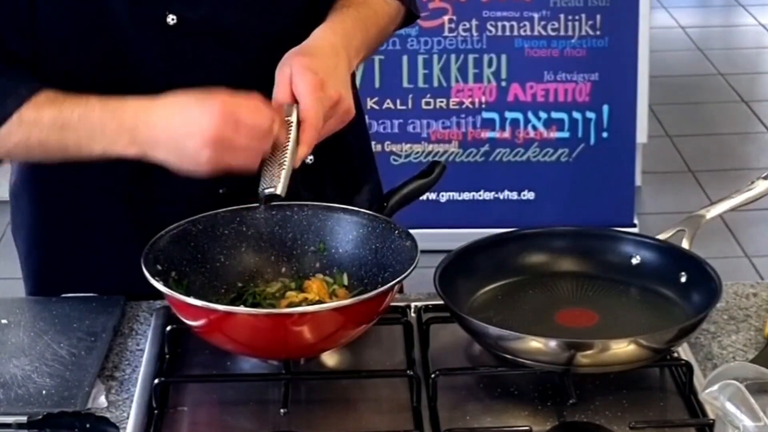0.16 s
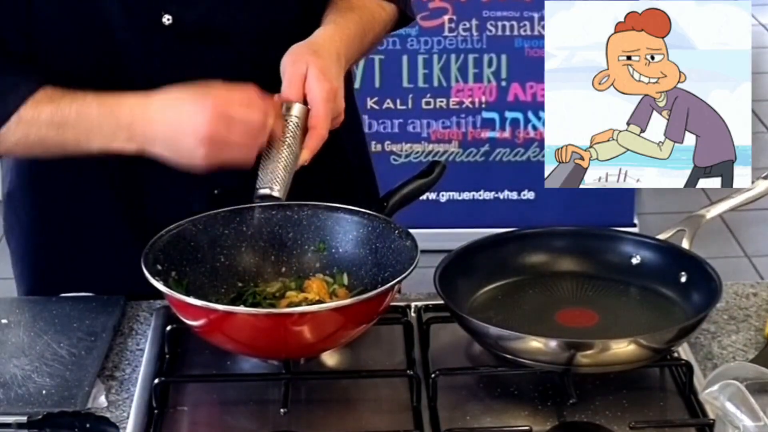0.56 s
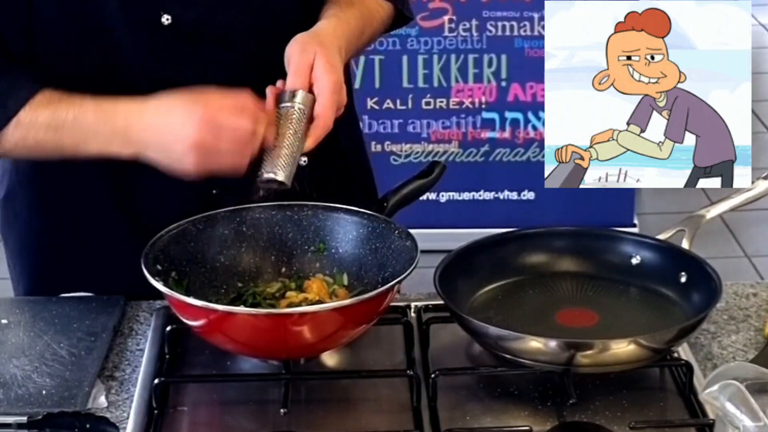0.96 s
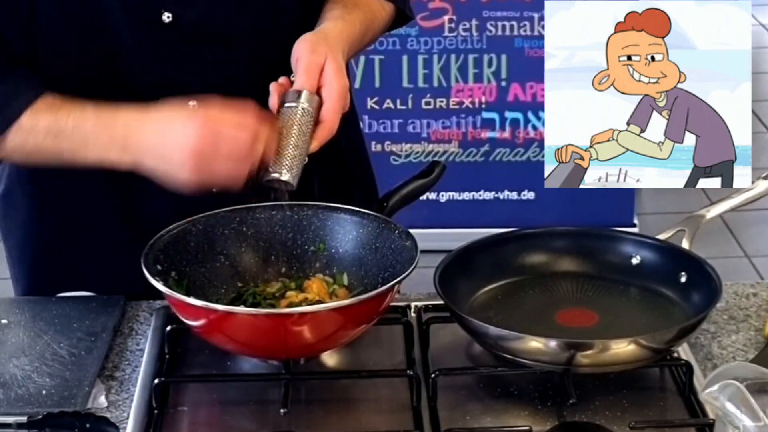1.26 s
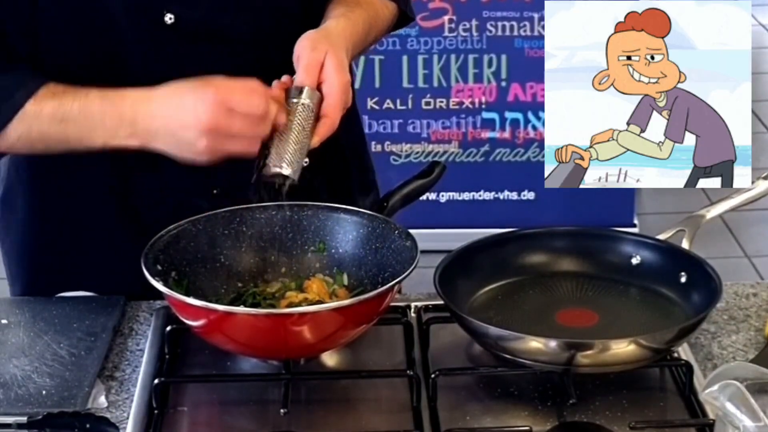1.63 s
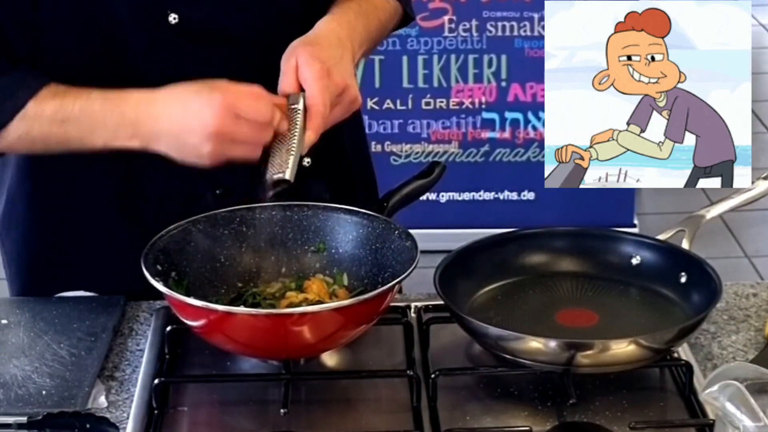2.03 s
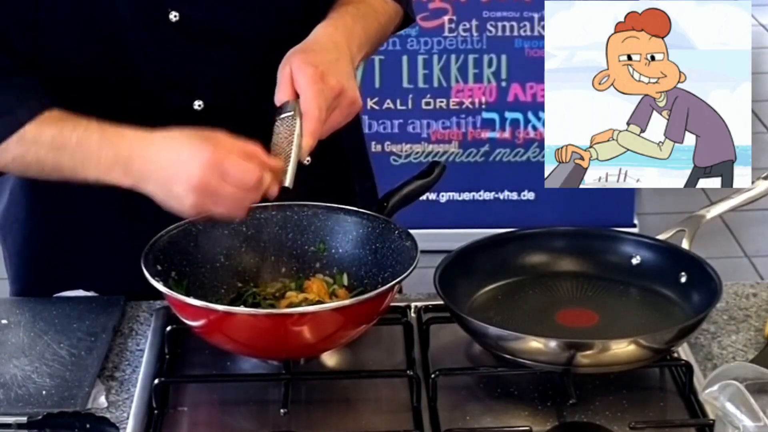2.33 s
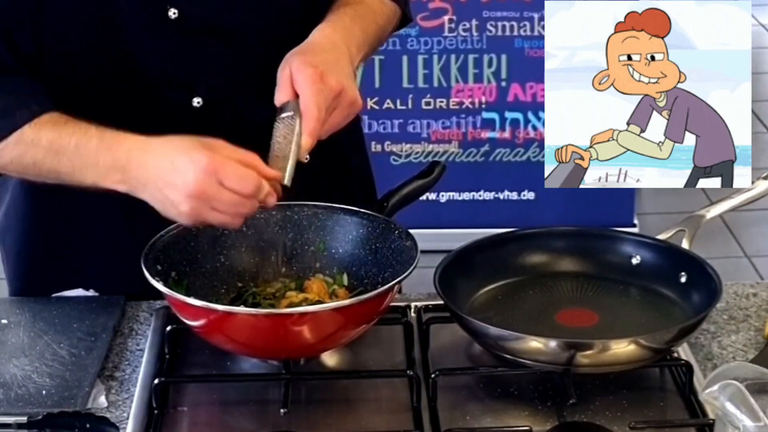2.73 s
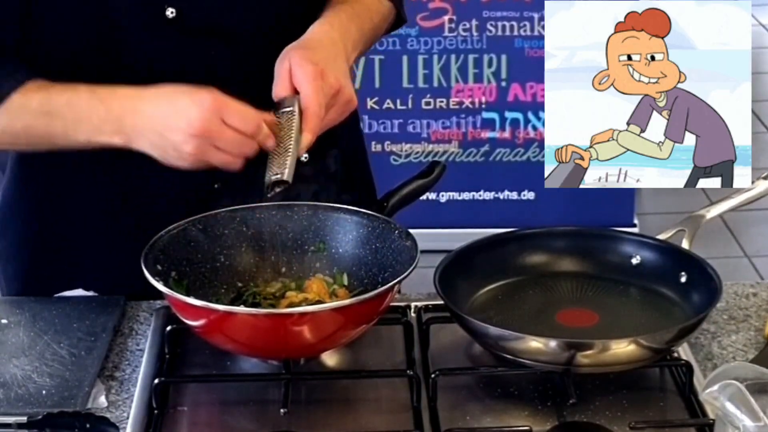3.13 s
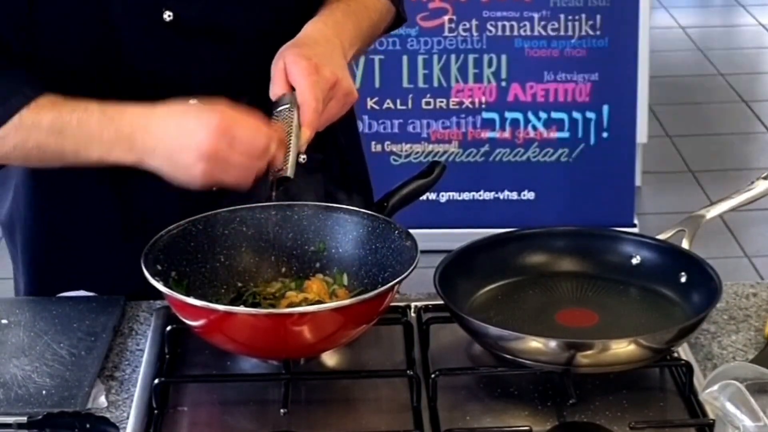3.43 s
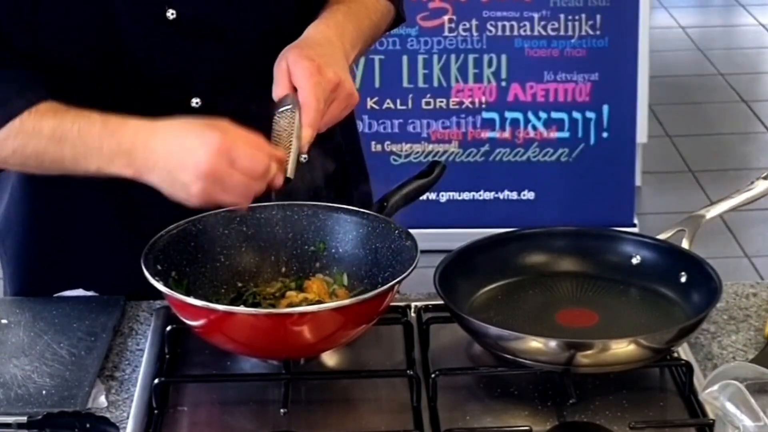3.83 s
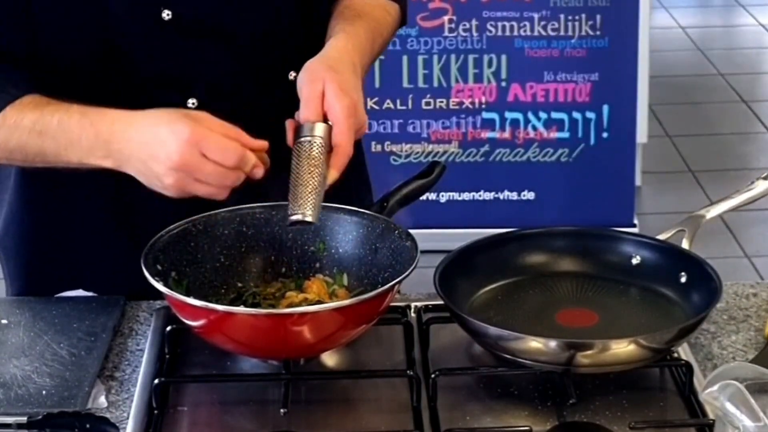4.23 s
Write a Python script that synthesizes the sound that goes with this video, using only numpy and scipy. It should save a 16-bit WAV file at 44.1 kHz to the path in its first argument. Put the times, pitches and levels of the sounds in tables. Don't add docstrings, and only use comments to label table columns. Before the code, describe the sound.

From 0 s a hard dry nutmeg is already being rubbed on a small curved steel grater, close to a small stereo camera. Short alternating strokes, roughly ten a second, each last about 0.06 s: dense crackling snaps blurred into a rasp, with fine bright grit, a thin metallic zing around 2 to 3 kHz and a hollow shell hum near 900 Hz. Pressure varies; sharper catches stand out, with a stronger boom at about 0.77 s. The bout ends near 2.75 s. Tiny slips and a set-down touch sound around 2.9 and 3.2 s, then a softer bout starts faintly at 3.27 s, firms up, with a harder catch and boom near 3.8 s, and stops about 4.05 s. Faint ticks follow, the clearest at 4.38 s. The tiled room adds a short tail of under half a second. Outside, low engine hums glide upward over muffled traffic rumble, strongest early, with faint air hiss.

```python
import sys
import numpy as np
from scipy import signal
from scipy.fft import rfft, irfft, next_fast_len
from scipy.io import wavfile
from scipy.ndimage import uniform_filter1d

SR = 44100
rng = np.random.default_rng(int(sys.argv[2]) if len(sys.argv) > 2 else 0)


def invert_db(x):
    u = np.asarray(x, float) / 20
    return 10 ** u


def put_to_file(sound):
    columns = np.atleast_2d(sound).T
    safe = np.clip(columns, -1, 1)
    whole_steps = np.round(safe * 32767)
    wavfile.write(sys.argv[1], SR, whole_steps.astype(np.int16))


N = 193554
T = np.arange(N) / SR

# pitch_hz, width_hz, level_db, left_lead_rad, left_minus_right_db
SHELL_MODES = [(519, 14, -6, 1.1, -11), (850, 27, -6, 0.86, 21), (934.5, 30, 18, 1.24, -1),
               (976, 20, -5, -0.79, 7), (1087, 190, -5.5, 0.093, -5), (1392, 35, -4.5, -1.1, 13),
               (1487, 36, -4, -2.3, -16)]
RIM_MODES = [(800, 43, -10, 0, 0), (990, 36, -5, .5, 0), (1050, 38, 3, 0, 0), (1277, 31, 12, -0.46, 0)]
FACE_MODES = [(2120, 41, 6.5, -3.5, 0.4), (2024, 29, -2, -12, 1), (2150, 62, -9, -1.5, 0.81),
              (2274, 140, 3.5, 2, 1.5), (2267, 88, 4, -0.54, 0.99), (2320, 46, 6.5, -0.46, 1.9),
              (2435, 71, -6, 4, 0.76), (2494, 67, 2, -4, 7), (2544, 88, 5, -6, 1.3),
              (2737, 60, -3, 0.7, 1.5), (2930, 150, -3, -6.5, 1.5)]
TEETH_MODES = [(2996, 96, -9, 1, 1.4), (3133, 48, -1, -1.5, 2.4), (3300, 66, -3, -1.8, 1.2),
               (3638, 114, -1.5, 1.05, 0.68), (3860, 160, -6.5, -2.54, 0.59), (4490, 140, -7.5, 1, 1),
               (4644, 86, -4, -3, 0.61), (4856, 112, -6, 1.87, 0.31), (5190, 240, -6, 1, 0.92),
               (5566, 250, -7.5, 1, 0.51), (6330, 130, -11.5, -1.5, 1), (6900, 196, -8, -1, 0.96),
               (7400, 330, -6.5, -2.5, 1.8)]
BURR_MODES = [(9280, 520, -1.5, -2, 0), (10670, 380, -2, 2, -1), (11580, 360, 0, -2, -1),
              (11940, 510, -4, 1.5, 0), (13000, 590, 4.5, -1.6, 0), (14140, 200, 0.5, 1, 0),
              (14600, 550, -5, -1, 0), (15300, 450, -3, -2, 0)]
# pitch_hz, level_db
RASP_COLOUR = [(400, -26), (700, -54), (1350, 0.5), (1780, -44), (2300, -2.5), (4100, -8.5), (5950, -6.5),
               (7600, -13.5), (8500, -18.5), (10000, -40)]
# pitch_hz, level_db
GRIT_COLOUR = [(7600, -10), (8600, 4.5), (9400, -1.5), (10800, -1), (11700, -1), (13200, -1.5), (14500, -1),
               (15800, -13)]
# start_s, length_s, level_db
KNOCKS = [
    (4.017, 0.026, -38.5),
]


def grater():
    face, shell, grit, place = contact()
    bite = snaps(rate_hz=2800., spread_db=3.0, row_db=2.0)
    bite[[int(row[0] * SR) + 9 for row in TOUCHES + LIGHT_TOUCHES]] = 7
    drag = snaps(rate_hz=12000., spread_db=2.5, row_db=1.0)
    burrs = np.array([snaps(rate_hz=9700.0, spread_db=2.0, row_db=2.0) for _ in range(2)])
    edge = face ** .25 * grit ** .75
    knock = sum(invert_db(db) * (T > s) * np.exp(-((T - s) / length) ** 2) for s, length, db in KNOCKS)

    trembling = drag * uniform_filter1d(shell, int(0.028 * SR))
    shell_hum = sheet(trembling + 0.55 * bite * shell, SHELL_MODES, patchy_db=3.5)
    rim_hum = sheet(drag * knock, RIM_MODES, patchy_db=11.0)
    hum = rms(shell) * level(shell_hum, -7.5) + rms(knock) * level(rim_hum, 0)
    hum = colour(hum, [(350, -68), (480, 2.5), (800, -12.5), (900, -2.5), (1500, -0.5), (1800, -11), (4000, -30)])

    face_zing = sheet(bite * face, FACE_MODES, patchy_db=4.0, lean_db=3.7 * place)
    teeth_zing = sheet(bite * edge, TEETH_MODES, patchy_db=6.5, patch_hz=45.05)
    zing = rms(face) * level(face_zing, -7.5) + rms(edge) * level(teeth_zing, 0.46)
    zing = colour(zing, [(600, -10), (1750, -7), (2000, -2.0), (7800, 0), (8500, 6.5), (12000, -21)])

    rasp = rms(edge) * level(colour((bite + 1.4 * burrs) * edge, RASP_COLOUR), -3.0)
    fine_grit = rms(grit) * level(colour((0.43 * bite + burrs) * grit, GRIT_COLOUR), -7.5)
    burr_ring = sheet(bite * grit, BURR_MODES, patchy_db=1.5, patch_hz=60.2)
    burr_ring = colour(burr_ring, [(7000, -37), (8800, -1), (9300, 1), (16500, -0.5)])
    return hum + zing + rasp + fine_grit + rms(grit) * level(burr_ring, -4.0)


# start_s, length_s, pressure_db
FIRST_BOUT = [(0.0, 0.027, -33.5), (0.066, 0.046, -35.5), (0.155, 0.064, -36), (0.258, 0.061, -37.5),
              (0.361, 0.056, -36), (0.464, 0.049, -32.5), (0.555, 0.07, -37), (0.673, 0.045, -37),
              (0.762, 0.056, -33.5), (0.862, 0.062, -33), (0.956, 0.072, -35.5), (1.066, 0.052, -38.5),
              (1.186, 0.049, -35), (1.274, 0.065, -37), (1.381, 0.069, -35), (1.48, 0.053, -36.5),
              (1.583, 0.063, -40.5), (1.688, 0.05, -37), (1.768, 0.061, -37.5), (1.879, 0.061, -39.5),
              (1.987, 0.059, -38.5), (2.092, 0.046, -35.5), (2.176, 0.069, -39.5), (2.284, 0.061, -37),
              (2.388, 0.073, -37), (2.49, 0.055, -32.5), (2.596, 0.069, -36), (2.692, 0.058, -37)]
SECOND_BOUT = [
    (3.268, 0.055, -47),
    (3.372, 0.052, -42),
    (3.466, 0.074, -41),
    (3.571, 0.064, -36.5),
    (3.674, 0.082, -40),
    (3.779, 0.048, -35),
    (3.888, 0.064, -39.5),
    (3.986, 0.063, -41),
    (4.383, 0.0058, -85),
]
# start_s, shell_db, grit_db
HOLD = [(0, -50, -54.5), (.3, -39.5, -51), (.48, -36, -51.5), (.6, -39.5, -50), (0.851, -38, -51),
        (1.3, -35, -46), (1.55, -42, -49), (1.9, -36.5, -49), (2.3, -42.5, -50), (2.7, -43, -49),
        (3.28, -47, -53.5), (3.45, -47, -51), (3.7, -47, -52.5), (4.0, -40, -50.5)]
# start_s, peak_db, grit_db
CATCHES = [(0.073, -35, -36), (0.0822, -30, -51), (0.67, -20, -21), (0.8614, -25, -12), (1.1895, -22, -12),
           (1.2305, -24, -12), (1.286, -21, -44), (1.3897, -26, -2.5), (1.6827, -26, -14),
           (1.7897, -30, -19), (2.107, -30, -14), (1.876, -30, -26), (1.889, -19, -33),
           (1.9841, -21.5, -10), (2.2916, -18.5, -33), (2.412, -23, -23), (2.7162, -17, -33),
           (3.394, -31, -17), (3.583, -31, -20), (3.7853, -22, -28)]
RIM_CATCHES = [
    (0.464, -32, -18),
    (0.7672, -17.5, -28),
    (3.8187, -21.5, -28),
]
# start_s, peak_db, shell_db, grit_db
LIGHT_TOUCHES = [
    (2.8875, -46, -8, -3),
    (3.1885, -33, -14, -22),
    (3.198, -46, 23, -14),
    (3.212, -42, -8, -16),
    (3.228, -43, -8, -14),
    (4.218, -48, 0, -18),
    (4.345, -46, -8, -16),
    (4.384, -30, -4, -18),
]
CATCH_SHELL_DB, RIM_SHELL_DB = -11, 5
TOUCHES = [(s, db, CATCH_SHELL_DB, grit_db) for s, db, grit_db in CATCHES]
TOUCHES += [(s, db, RIM_SHELL_DB, grit_db) for s, db, grit_db in RIM_CATCHES]


def contact(fall_s=0.013, touch_s=0.0067, touch_db=-8.0):
    usual_push_db = -37
    shell_follows, grit_follows = 0.53, 0.5
    down_shell_db, down_grit_db = 3.0, 0.1
    arch_db = 2.5
    pressure, place = np.zeros((3, N)), np.zeros(N)
    s, shell_db, grit_db = np.transpose(HOLD)
    for k, (start, length, db) in enumerate(FIRST_BOUT + SECOND_BOUT):
        near = slice(max(int((start - .1) * SR), 0), int((start + .3) * SR))
        t, down, extra_db = T[near] - start, k % 2, db - usual_push_db
        along = np.clip(t / length, 0, 1) - .5
        rise_s = 0.0084 if down else 0.0066
        swell_db = 0.2 if down else -0.27
        grip = np.exp(np.minimum(np.minimum(t / rise_s, (length - t) / fall_s), .7))
        shell_felt = np.interp(start, s, shell_db) + shell_follows * extra_db + down_shell_db * (down - .5)
        grit_felt = np.interp(start, s, grit_db) + grit_follows * extra_db + down_grit_db * (down - .5)
        travel = invert_db(2 * swell_db * along + arch_db * (.5 - (2 * along) ** 2))
        pressure[:, near] += grip * travel * invert_db([[db], [shell_felt], [grit_felt]])
        place[near] = np.where(t > -.015, along, place[near])
    for start, db, touch_shell_db, touch_grit_db in TOUCHES + LIGHT_TOUCHES:
        near = slice(int(start * SR), int((start + .1) * SR))
        felt_db = db + touch_db + np.array([[0], [touch_shell_db], [touch_grit_db]])
        pressure[:, near] += np.exp((start - T[near]) / touch_s) * invert_db(felt_db)
    return *pressure, place


def snaps(rate_hz, spread_db, row_db, top_db=12.0):
    moment, strength, direction = rng.random((3, N))
    size = invert_db(np.minimum(-spread_db * np.log(strength), top_db)) * np.sign(direction - .5)
    return level((moment < rate_hz / SR) * size * invert_db(row_db * walk(190.)), 0)


def sheet(force, modes, patchy_db, patch_hz=25.04, lean_db=0):
    out, middle_hz = np.zeros((2, N)), np.mean(modes, axis=0)[0]
    for hz, width_hz, db, lead, pan_db in modes:
        drive_db = db + patchy_db * np.tanh(walk(patch_hz)) + lean_db * np.log2(hz / middle_hz)
        z = ring(force * invert_db(drive_db), hz, width_hz)
        left = z * invert_db(pan_db / 2) * np.exp(.5j * lead)
        right = z * invert_db(-pan_db / 2) * np.exp(-.5j * lead)
        out += np.imag([left, right])
    return out


def kitchen(x, t60_s=0.44, mid_t60_s=0.42, high_t60_s=0.37, wet_db=-5.0, gap_s=0.00311, alike=0.36):
    t = T[:SR]
    noise = rng.standard_normal((2, SR)) + alike * rng.standard_normal(SR)
    low, mid = (signal.sosfilt(signal.butter(2, hz, fs=SR, output="sos"), noise) for hz in (3500, 8000))
    tail = low * invert_db(-60 * t / t60_s)
    tail += (mid - low) * invert_db(-60 * t / mid_t60_s)
    tail += (noise - mid) * invert_db(-60 * t / high_t60_s)
    tail *= (t > gap_s) * invert_db(wet_db) / np.sqrt(np.sum(tail ** 2) / 2)
    return x + signal.fftconvolve(x, tail, axes=1)[:, :N]


# start_s, end_s, halfway_hz, level_db
LORRY = [(-.2, .3, 60.2, -38), (-.1, 1.179, 73.8, -36.5), (-.1, 1.295, 83.8, -52),
         (-.1, 0.59, 130.5, -44.5), (-.1, 0.596, 143.7, -43.5), (-.1, 0.67, 175.9, -41.5),
         (0.392, 1.353, 172.2, -45), (0.798, 1.3, 210.5, -47.5), (0.957, 1.7, 140.2, -47.5),
         (1.107, 2.29, 74.6, -53), (1.248, 1.941, 202.4, -44.5), (1.319, 2.358, 169.8, -43),
         (1.725, 3.104, 60.5, -35.5)]
VAN = [
    (2.801, 4.629, 73.47, -41.5),
    (3.31, 4.7, 59.9, -41.5),
]
BUS = [
    (2.194, 3.404, 100.4, -49.5),
    (3.002, 3.88, 203.6, -50),
    (3.402, 4.514, 134.4, -47.5),
    (3.594, 4.6, 166.1, -47.5),
]


def engine(wobble_db=4.0, unsteady=0.0031):
    out, speed = np.zeros((2, N)), 1 + unsteady * walk(5.925)
    for orders, gain_per_s in [(LORRY, 0.096), (VAN, 0.1573), (BUS, 0.0531)]:
        for start, end, middle_hz, db in orders:
            near = slice(max(int(start * SR), 0), int(end * SR))
            along = np.clip((T[near] - start) / (end - start), 0, 1)
            hz = middle_hz * (1 + gain_per_s * (along - .5) * (end - start)) * speed[near]
            phase = 2 * np.pi * (np.cumsum(hz) / SR + rng.random((2, 1)))
            swell = np.sqrt(np.sin(np.pi * along) + 1e-9)
            out[:, near] += swell * invert_db(db + 1.5 + wobble_db * np.tanh(walk(9.)[near])) * np.sin(phase)
    return out


# start_s, level_db
TRAFFIC = [(0, -53.5), (.9, -51), (1.798, -54), (2.6, -61.5), (3.298, -58), (4.39, -57.5)]
# pitch_hz, level_db
TRAFFIC_COLOUR = [(15, -20), (30, -11), (45, -38), (60, 5), (220, -9.5), (300, -8.5), (420, -17.5),
                  (800, -20), (1500, -27)]
# pitch_hz, width_hz, level_db
ROOM_MODES = [(66, 5.3, -56), (78, 7, -46.5), (86.5, 14, -55), (138.2, 5.6, -51), (163.3, 17, -50.5),
              (207.1, 2.5, -53)]
# pitch_hz, level_db
AIR_COLOUR = [(400, 2), (700, -1.5), (1700, -7), (2500, -7), (4000, -13), (7500, -18), (8500, -25),
              (16000, -26)]
# start_s, level_db
RUSTLE = [(0, 3), (3.1, -0.5), (3.2, 1.5), (4.1, -0.5), (4.39, 2)]


def background():
    swell = invert_db(np.interp(T, *np.transpose(TRAFFIC)))
    rumble = level(colour(rng.standard_normal((2, N)), TRAFFIC_COLOUR), 9.67) * swell
    boom = sum(level(ring(rng.standard_normal((2, N)), hz, w).real, db) for hz, w, db in ROOM_MODES)
    boom = colour(boom, [(40, -27), (55, 2.5), (250, -3), (400, -15)])
    air = level(colour(rng.standard_normal((2, N)), AIR_COLOUR), -59)
    return rumble + boom + air * invert_db(1.6 * walk(12.) + np.interp(T, *np.transpose(RUSTLE)))


# pitch_hz, side_minus_mid_db
SIDE_SHARE = [(60, -30), (125, -23), (250, -17), (500, -9.5), (1500, -2.5), (8000, 0)]


def wide(x):
    side = colour(x[1], [(1, -40), *SIDE_SHARE, (SR / 2, 0)])
    return np.array([x[0] + side, x[0] - side])


def rms(x):
    return np.sqrt(np.mean(x ** 2))


def level(x, db):
    return x * invert_db(db) / rms(x)


def colour(x, points):
    hz, db = np.transpose(points)
    size = next_fast_len(N + 4096)
    axis = np.log(np.arange(size // 2 + 1) * SR / size + 1)
    gain = invert_db(np.interp(axis, np.log(hz), db, -90, -90))
    return irfft(rfft(x, size) * gain, size)[..., :N]


def walk(rate_hz):
    k = int(SR / rate_hz)
    steps = rng.standard_normal(N // 20)[:N // k + 1]
    y = uniform_filter1d(uniform_filter1d(np.repeat(steps, k), k), k)[:N]
    return y / y.std()


def ring(x, hz, width_hz):
    fall = np.exp(-np.pi * width_hz / SR)
    return 2 * (1 - fall) * signal.lfilter([1], [1, -fall * np.exp(2j * np.pi * hz / SR)], x)


def scene():
    return kitchen(grater()) + wide(engine() + background())


def top_cut(x):
    return signal.sosfilt(signal.butter(12, 16660, fs=SR, output="sos"), x)


# pitch_hz, level_db
HOUSING = [(10, 0), (7900, 0), (8550, -7), (9200, 0), (22050, 0)]


def record(dry):
    low_pass = signal.ellip(10, .2, 70, 15800, fs=SR, output="sos")
    mix = signal.sosfilt(low_pass, colour(dry, HOUSING))
    return top_cut(mix)


dry = scene()
out = record(dry)
put_to_file(out)
```